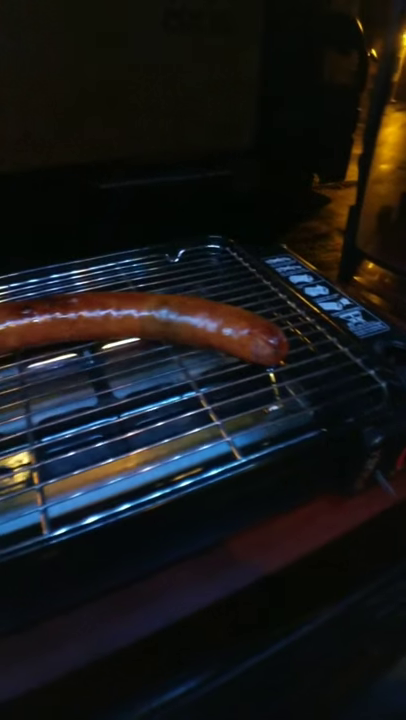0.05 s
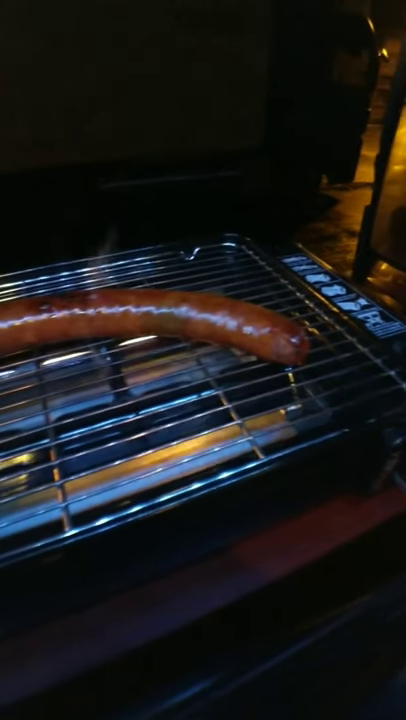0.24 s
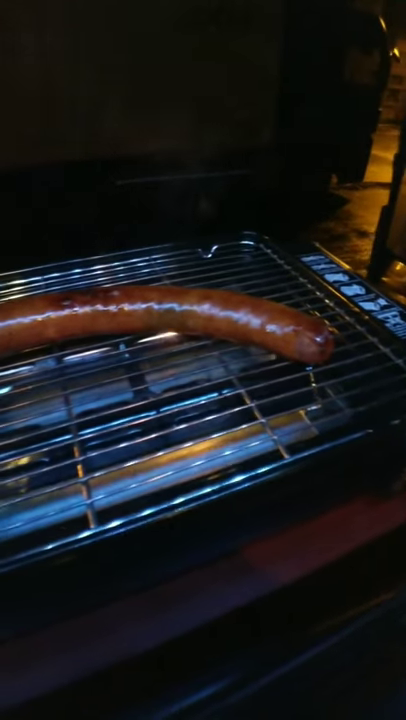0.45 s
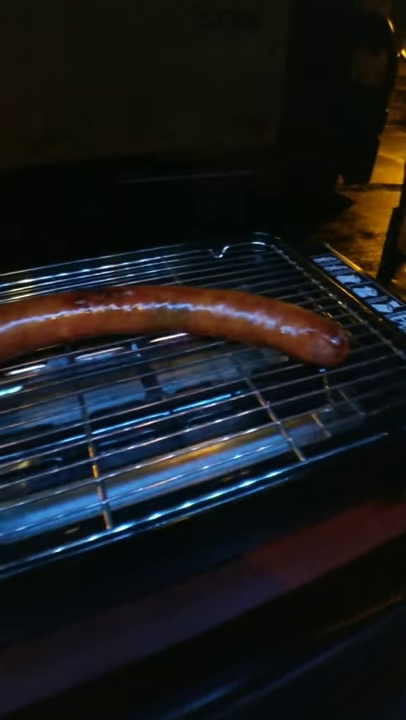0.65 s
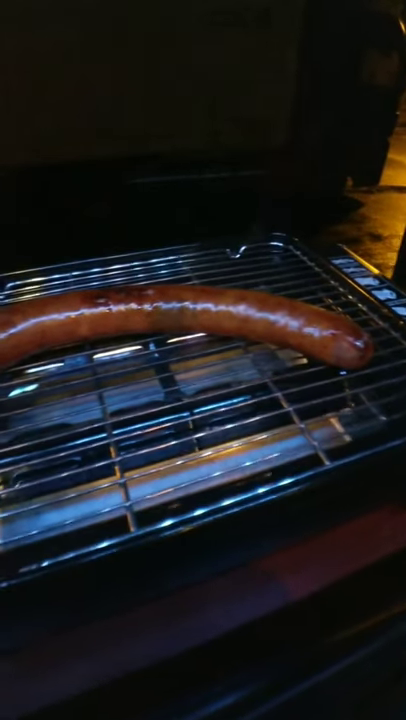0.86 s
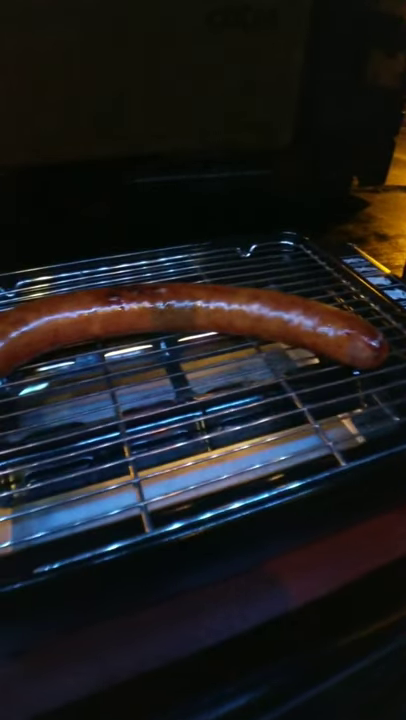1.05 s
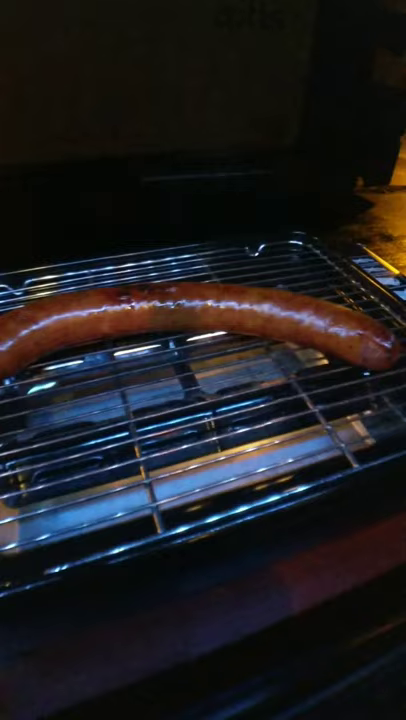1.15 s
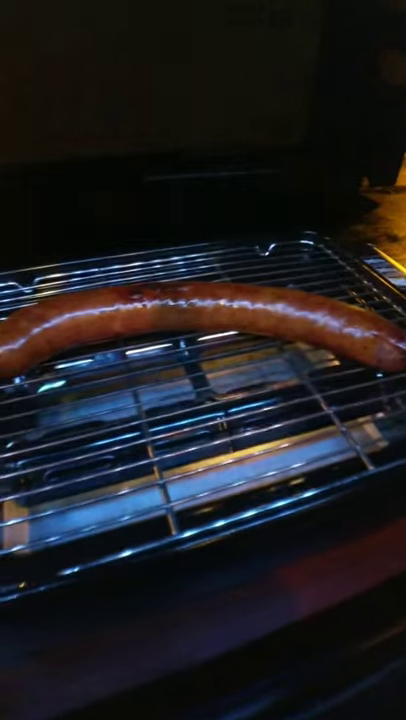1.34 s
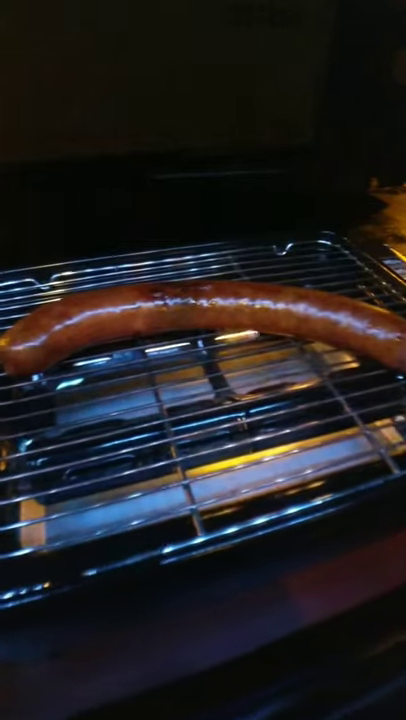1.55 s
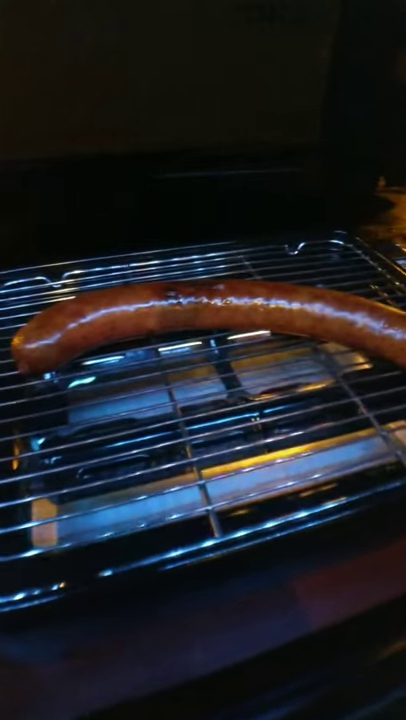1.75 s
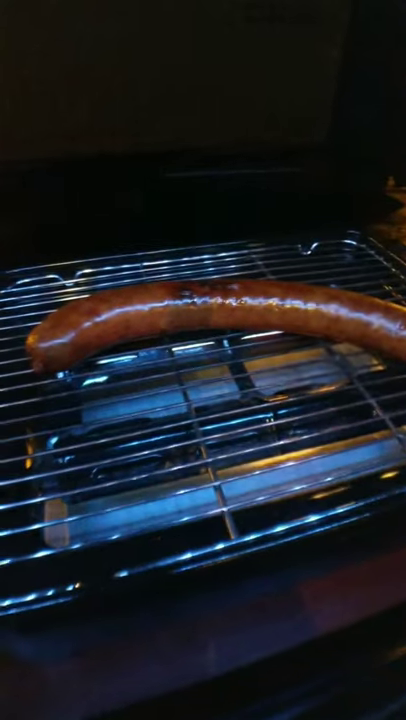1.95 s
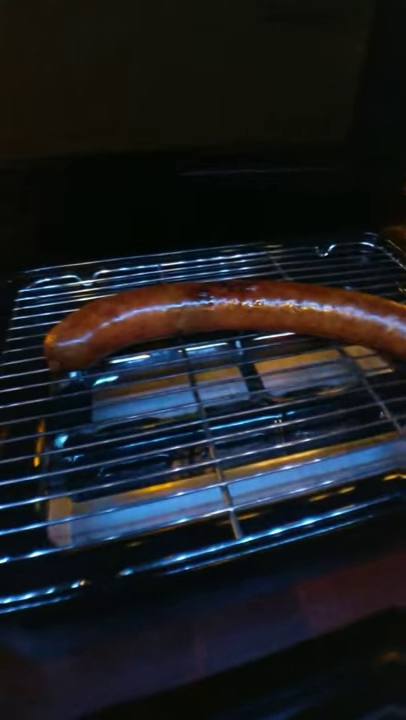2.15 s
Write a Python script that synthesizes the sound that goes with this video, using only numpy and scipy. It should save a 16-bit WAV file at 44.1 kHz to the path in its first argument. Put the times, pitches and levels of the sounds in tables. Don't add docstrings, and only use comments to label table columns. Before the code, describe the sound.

Close sizzling of a sausage on a small wire grill: bright fat pops and thin steam hiss over a low idling drone inside a vehicle cab, with one handling knock on the microphone about a quarter through.

```python
import sys
import numpy as np
from scipy import signal
from scipy.fft import rfft, irfft, next_fast_len
from scipy.io import wavfile
from scipy.ndimage import uniform_filter1d, map_coordinates

SR = 44100
rng = np.random.default_rng(int(sys.argv[2]) if len(sys.argv) > 2 else 0)


def pcm_store(signal):
    levels = np.round(np.clip(np.atleast_2d(signal), -1, 1) * 32767)
    wavfile.write(sys.argv[1], SR, levels.astype(np.int16).T)


def volts(x):
    e = np.asarray(x, float) / 20
    return 10 ** e


N = 97196
TIME_S = np.arange(N) / SR
END_S = 1.9335


def unit(x):
    return x / np.sqrt(np.mean(x ** 2) + 1e-20)


def along(points, hz):
    point_hz, value = np.transpose(points)
    return np.interp(np.log(hz + 1), np.log(point_hz + 1), value)


def wobble(rate):
    points = rng.standard_normal(int(N * rate / SR) + 4)
    return map_coordinates(points, [np.arange(N) * rate / SR])


def filtered(x, response):
    size = next_fast_len(N + SR // 2)
    spectrum = rfft(x, size) * response(np.fft.rfftfreq(size, 1 / SR))
    return irfft(spectrum, size)[..., :N]


def resonances(peaks):
    def response(f):
        return sum(volts(db) * 1j * f * width / (centre * centre - f * f + 1j * f * width)
                   for centre, width, db in peaks)
    return response


def ringing_noise(peaks):
    once = filtered(rng.standard_normal(N), resonances(peaks))
    return unit(filtered(once, resonances(peaks)))


def rush(spectrum, patchy_db):
    grid = signal.stft(rng.standard_normal(N), nperseg=256)[2]
    patches = uniform_filter1d(rng.standard_normal(grid.shape), size=7, axis=0)
    patches = uniform_filter1d(patches, size=3, axis=1)
    noise = signal.istft(grid * volts(patchy_db * unit(patches)), nperseg=256)[1][:N]
    return unit(filtered(noise, lambda hz: volts(along(spectrum, hz))))


def bursts(s, db, hz, t60_s, width_oct):
    size = 1024
    t = np.arange(size) / SR
    f = np.fft.rfftfreq(size, 1 / SR) + 1
    band = np.exp(-.5 * (np.log2(f / hz[:, None]) / width_oct) ** 2)
    puff = irfft(rfft(rng.standard_normal((len(s), size))) * band, size)
    puff = puff / puff.std(axis=1, keepdims=True)
    tray_t60_s, tray_db = .03, -15
    fall = volts(-60 * t / t60_s[:, None]) + volts(tray_db - 60 * t / tray_t60_s)
    rise = 1 - np.exp(-t / .0001)
    snap_db, snap_t60_s = 8, .0005
    snap = volts(snap_db - 60 * t / snap_t60_s) * np.cos(2 * np.pi * hz[:, None] * t)
    shape = puff * fall * rise + snap
    shape = shape / np.abs(shape).max(axis=1, keepdims=True) * volts(db)[:, None]
    at = np.round(s * SR).astype(int)[:, None] + np.arange(size)
    return np.bincount(at.ravel(), shape.ravel(), N + size)[:N]


# start in seconds, peak level in dB,
# colour in Hz, time to fall by 60 dB in milliseconds.
POPS = [(0.0835, -34.0, 9900.0, 4.0), (0.0978, -34.0, 9900.0, 8.0), (0.1132, -26.0, 10500.0, 14.0),
        (0.1265, -34.0, 9300.0, 12.0), (0.1608, -37.0, 9200.0, 14.0), (0.1674, -37.0, 8900.0, 14.0),
        (0.1872, -32.0, 10200.0, 7.0), (0.1921, -34.0, 8600.0, 14.0), (0.2584, -34.0, 8400.0, 4.0),
        (0.279, -36.0, 8200.0, 8.0), (0.2955, -31.0, 8400.0, 9.0), (0.3078, -35.0, 8600.0, 10.0),
        (0.3221, -33.0, 8800.0, 4.0), (0.3476, -33.0, 9500.0, 4.0), (0.3596, -35.0, 7000.0, 10.0),
        (0.413, -35.0, 6500.0, 8.0), (0.4205, -30.0, 10400.0, 4.0), (0.4356, -34.0, 9000.0, 4.0),
        (0.4449, -34.0, 8600.0, 7.0), (0.4928, -36.0, 8300.0, 14.0), (0.5183, -29.0, 8700.0, 9.0),
        (0.5228, -32.0, 6600.0, 6.0), (0.5367, -34.0, 10400.0, 12.0), (0.5442, -28.0, 8500.0, 9.0),
        (0.5743, -34.0, 8800.0, 4.0), (0.6008, -36.0, 11500.0, 8.0), (0.6105, -35.0, 7200.0, 9.0),
        (0.6192, -34.0, 9800.0, 4.0), (0.6301, -34.0, 6900.0, 5.0),
        (0.6386, -36.0, 5800, 8.0), (0.6675, -29.0, 8800, 4), (0.6733, -36.0, 9000, 8.0),
               (0.6837, -35.0, 7100, 9.0), (0.6923, -36.0, 6300, 4), (0.7144, -39.0, 6800, 11.0),
               (0.7433, -33.0, 9400, 8.0), (0.7529, -31.0, 7700, 10.0), (0.7846, -32.0, 6600, 5.0),
               (0.8207, -31.0, 7000, 14), (0.8347, -27.0, 7800, 8.0), (0.8387, -31.0, 7800, 4),
               (0.8662, -31.0, 9900, 14), (0.8813, -30.0, 9600, 10.0), (0.9043, -38.0, 8500, 8.0),
               (0.9453, -32.0, 6900, 6.0), (0.9504, -32.0, 8500, 10.0), (0.9982, -33.0, 7400, 8.0),
               (1.012, -37.0, 7500, 7.0), (1.054, -29.0, 9800, 4), (1.0884, -31.0, 7800, 4.0),
               (1.096, -28.0, 7600, 14), (1.1264, -33.0, 9600, 11.0), (1.1575, -28.0, 7000, 5.0),
               (1.1675, -26.0, 12000, 4.0), (1.1853, -29.0, 10800, 5.0), (1.1916, -34.0, 9000, 7.0),
               (1.2151, -27.0, 6500, 5.0), (1.2247, -38.0, 7600, 8.0), (1.2352, -33.0, 11600, 11.0),
        (1.2601, -27.0, 10100, 10.0), (1.2853, -35.0, 7300, 6.0), (1.3214, -37.0, 7300, 7.0),
             (1.354, -36.0, 7700, 5.0), (1.3706, -32.0, 7600, 7.0), (1.3879, -31.0, 8700, 6.0),
             (1.4304, -30.0, 8800, 9.0), (1.4633, -30.0, 10100, 6.0), (1.4746, -30.0, 9100, 6.0),
             (1.5016, -38.0, 7700, 6.0), (1.5206, -36.0, 9000, 6.0), (1.5355, -31.0, 11100, 5.0),
             (1.5471, -24.0, 9000, 4), (1.5729, -33.0, 9400, 11.0), (1.5891, -34.0, 9300, 7.0),
             (1.5982, -31.0, 8200, 4), (1.6097, -20.0, 8400, 6.0), (1.6421, -31.0, 7300, 4),
             (1.6493, -31.0, 8100, 4), (1.6514, -40.0, 8600, 10.0), (1.6727, -35.0, 8200, 10.0),
             (1.6829, -27.0, 8000, 6.0), (1.7284, -25.0, 6700, 4.0), (1.7384, -28.0, 8600, 5.0),
             (1.7595, -35.0, 8800, 12.0), (1.7659, -36.0, 8900, 7.0), (1.7825, -33.0, 5200, 7.0),
             (1.8622, -35.0, 8100, 5.0), (1.8651, -34.0, 7400, 11.0), (1.9122, -37.0, 7400, 5.0)]


def pops():
    s, db, hz, t60_ms = np.transpose(POPS)
    return bursts(s, db - 3, hz, np.maximum(t60_ms, 2) / 1000, width_oct=.75)


# time in seconds, liveliness in dB.
FRYING = [
    (0.0, -62.5),
    (0.188, -54.5),
    (0.524, -52.5),
    (1.422, -58),
    (1.626, -56),
    (1.734, -56.5),
    (1.78, -54.5),
]


def frying_db():
    return np.interp(TIME_S, *np.transpose(FRYING))


def spits(lively_db):
    count = 520
    chance, spread = rng.random((count, 2)), rng.standard_normal((count, 2))
    s = chance[:, 0] * END_S
    db = -53 - 4.5 * np.log(np.maximum(chance[:, 1], .22))
    db = db + 0.58 * (lively_db - lively_db.mean())[(s * SR).astype(int)]
    hz = np.clip(8300 * 2 ** (.4 * spread[:, 0]), 4500, 14000)
    t60_s = .0045 * volts(1.2 * spread[:, 1])
    return bursts(s, db, hz, t60_s, width_oct=.45)


# frequency in Hz, level in dB per Hz.
HISS = [(1470, -40), (2500, -4), (4200, -6), (5200, -1.5), (7800, -7), (8900, -5), (10500, -3),
        (15500, -8.5), (16000, -12)]


def steam(lively_db):
    colour = [(700, -39.5)] + HISS[1:-1]
    return volts(lively_db - 5.5) * rush(colour, patchy_db=3.5)


# frequency in Hz, width in Hz, level in dB.
JET = [
    (9000, 900, 0),
]


def jet():
    start_s, rise_s = 0.9, 0.6
    rise = np.clip((TIME_S - start_s) / rise_s, 0, 1)
    return rise * volts(-63 + 4 * wobble(65)) * ringing_noise(JET)


# frequency in Hz, width in Hz, level in dB.
TRAY = [
    (3500, 500, -1),
    (5150, 800, 2),
    (7200, 600, 0),
    (8900, 900, 5),
    (10900, 1100, 2),
    (12500, 700, -2),
]
# delay in seconds, level in dB.
WALLS = [
    (.0006, -10),
    (.0031, -14),
]


def through_tray(crackle):
    def response(f):
        thin = (1j * f / (1000 + 1j * f)) ** 2
        walls = 1 + sum(volts(db) * np.exp(-2j * np.pi * f * s) for s, db in WALLS)
        return thin * walls * (1 + volts(-2.5) * resonances(TRAY)(f))
    return filtered(crackle, response)


def sizzle():
    lively_db = frying_db()
    return through_tray(spits(lively_db) + pops()) + steam(lively_db) + jet()


# start in seconds, peak level in dB, pitch in Hz.
LOW_BLIPS = [(0.1588, -40, 5620), (0.2784, -47, 5620), (0.3387, -43, 5550), (0.3597, -41, 4690),
             (0.4145, -47, 4790), (0.4848, -45.5, 5540), (0.5222, -37.5, 4820), (0.617, -39, 4890),
             (0.648, -39.5, 5510), (0.791, -40.5, 5290), (0.835, -39, 5150), (0.8472, -36.5, 5310),
             (0.9038, -48.5, 5100), (0.9448, -39.5, 5110), (0.971, -40.5, 5080), (0.9973, -44, 5120),
             (1.0032, -39.5, 5440), (1.095, -41, 5340), (1.1716, -36, 5130), (1.2631, -32, 6000),
             (1.2734, -45.5, 5080), (1.285, -40, 5150), (1.3204, -44, 5330), (1.3703, -47, 5150),
             (1.4298, -43.5, 5130), (1.547, -45.5, 5330), (1.61, -34.5, 5460), (1.6838, -42.5, 4920),
             (1.7292, -34, 5210), (1.7388, -40, 5470), (1.7833, -30.5, 4920)]
HIGH_BLIPS = [(0.0947, -28, 11730), (0.138, -31, 9920), (0.181, -35, 9600), (0.365, -32, 10400),
              (0.4203, -28, 10430), (0.597, -30, 10680), (0.605, -31, 10400), (0.6924, -37, 11770),
              (0.882, -26, 10800), (0.9194, -41.5, 9260), (1.0264, -34, 8100), (1.1696, -20.5, 9920),
              (1.386, -29.5, 8660), (1.476, -25, 9150), (1.5064, -31.5, 9290), (1.5295, -28, 8930),
              (1.6216, -30.5, 8500), (1.7874, -34, 11200), (1.8239, -35.5, 8700)]


def blips():
    s, db, hz = np.transpose(LOW_BLIPS + HIGH_BLIPS)
    low_db, high_db = 5, -3
    trim_db = np.where(np.arange(len(s)) < len(LOW_BLIPS), low_db, high_db)
    return bursts(s, db + trim_db, hz, np.full(len(s), 0.0088), width_oct=0.28)


# start in seconds, peak level in dB, colour in Hz.
STRAY_POPS = [(.2668, -35, 9000), (.2705, -38, 5500), (.29, -39, 10500), (.3048, -36, 11000),
              (.4078, -38, 9500), (.452, -38, 9300), (1.7095, -39, 8000), (1.7215, -38, 10000),
              (.4129, -41, 3800), (.5801, -37, 9500), (.6301, -41, 5200), (.8105, -38, 9500),
              (.8347, -34, 3200), (.8425, -42, 3000), (.86, -39, 8000), (1.094, -35, 9000),
              (1.1575, -35, 3700), (1.2151, -36, 3500), (1.6097, -32, 3500), (1.7284, -31, 3600),
              (1.7825, -37, 3500)]


def stray_pops():
    s, db, hz = np.transpose(STRAY_POPS)
    return bursts(s, db, hz, np.full(len(s), .006), width_oct=.45)


# frequency in Hz, level in dB per Hz.
TICK = [(500, -36.5), (2000, -1.5), (5000, -7.5), (11000, -7), (16000, -1.5)]


def knock():
    knock_s, tick_s, mono_again_s = .5449, .5441, .55655
    since = np.maximum(TIME_S - knock_s, 0)
    swing = -volts(-16.8 - 60 * since / .17) * np.sin(np.pi * (since / .0021) ** .545)
    swing = swing * (1 - np.exp(-since / .0011))
    since_hold = np.maximum(TIME_S - tick_s - .0016, 0)
    fall = (TIME_S > tick_s) * volts(-33 - 60 * since_hold / .007)
    ticks = fall * np.array([rush(TICK, patchy_db=.5), rush(TICK, patchy_db=1.5)])
    return (TIME_S < mono_again_s) * (ticks + np.array([swing, 0 * swing]))


# frequency in Hz, level in dB.
PORTS = [(20, -11.5), (60, 18), (150, 17), (400, -16.5), (2000, -61.5), (9000, -17), (16000, -21.5)]


def hand_noise(opening):
    left = opening * volts(-41) * rush(PORTS, patchy_db=9.5)
    return np.array([left, -0.21 * left])


# frequency in Hz, level in dB per Hz.
DRONE = [(15, -46), (25, -15.5), (108, -0.5), (165, -10.5), (201, -6), (382, -12.5), (533, -14),
         (3210, -27.5), (5000, -32.5), (6500, -32.5), (11000, -120)]
# frequency in Hz, width in Hz, level in
# dB.
BOOM = [
    (106.5, 30, -2),
    (204.4, 13, -5),
    (375, 28, -7),
    (411.4, 21, -9),
    (459.6, 11, -14.5),
    (609.3, 52, -17),
    (824.6, 19, -16.5),
]


def drone():
    boom = ringing_noise(BOOM)
    rumble = rush([(8.1, -42.5)] + DRONE[1:-1] + [(9000, -36.5)], patchy_db=1.16)
    return volts(-47 + .5 * wobble(5.9)) * unit(rumble + volts(-2) * boom)


# frequency in Hz, rms level in dB.
HUM = [
    (204, -60),
    (413, -66.5),
    (825, -70.5),
]


def hum():
    turns = np.cumsum(1 + .008 * wobble(12)) / SR
    return sum(np.sqrt(2) * volts(db + 2.0 * wobble(14)) * np.sin(2 * np.pi * hz * turns) for hz, db in HUM)


def scene():
    opening_s = .0465
    opening = TIME_S < opening_s
    dip_db = -5 * np.exp(-(TIME_S - opening_s) / 0.17)
    drone_gain = volts(np.where(opening, 6, dip_db))
    frying = sizzle() + blips() + stray_pops()
    cab = drone_gain * drone() + hum()
    return frying + knock() + hand_noise(opening) + cab


def low_pass(x):
    return signal.sosfilt(signal.butter(12, 16840, fs=SR, output="sos"), x)


def record(dry):
    fade = np.clip((END_S - TIME_S) / .004, 0, 1)
    mix = filtered(dry, lambda hz: np.where(hz < 15850, 1, volts(-42))) * fade
    return low_pass(mix)


dry = scene()
out = record(dry)
pcm_store(out)
```